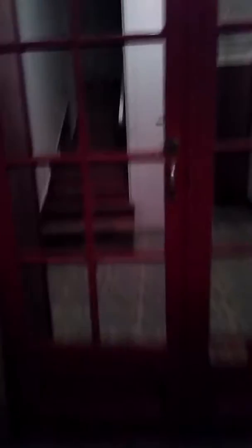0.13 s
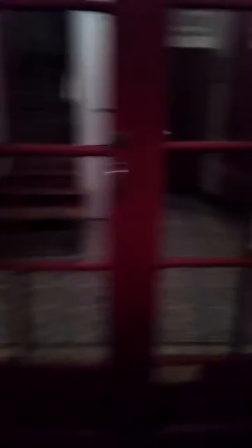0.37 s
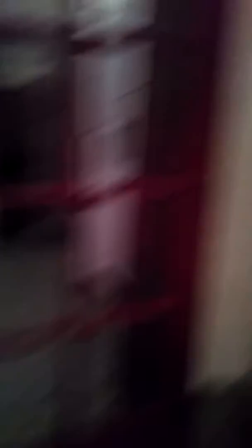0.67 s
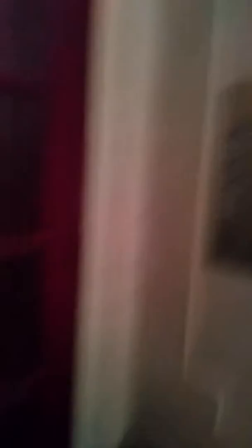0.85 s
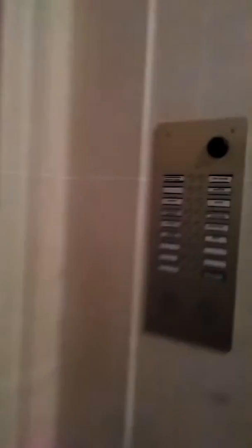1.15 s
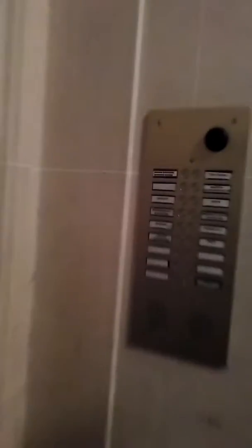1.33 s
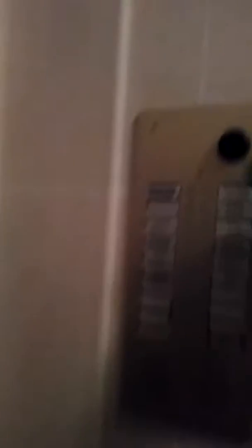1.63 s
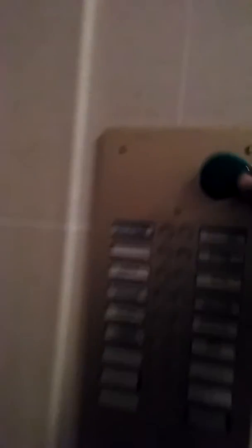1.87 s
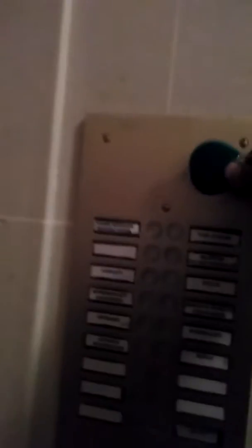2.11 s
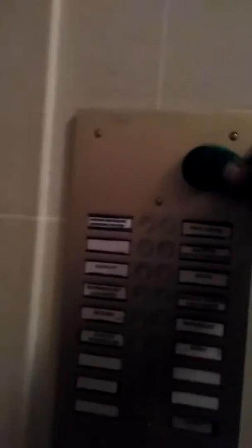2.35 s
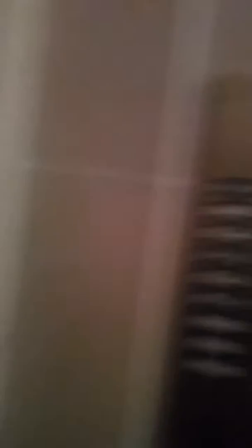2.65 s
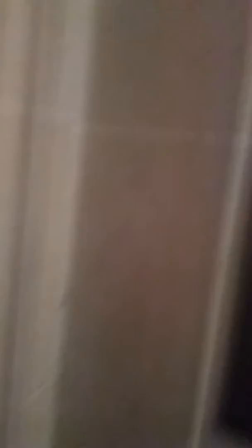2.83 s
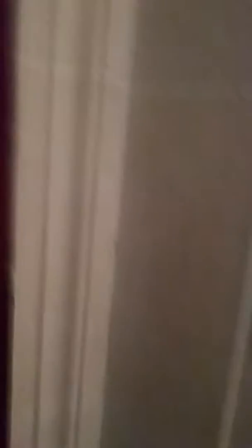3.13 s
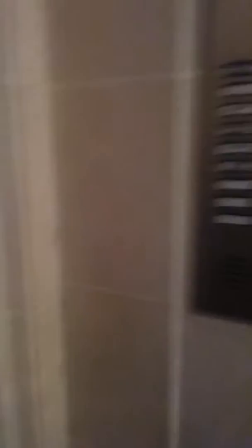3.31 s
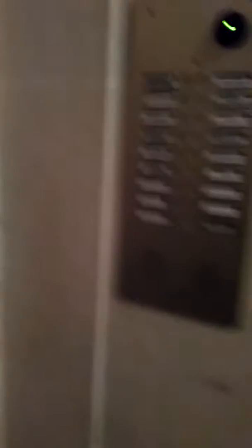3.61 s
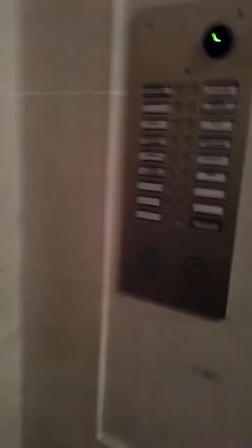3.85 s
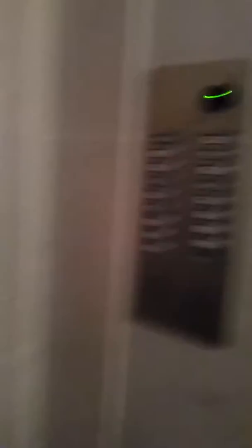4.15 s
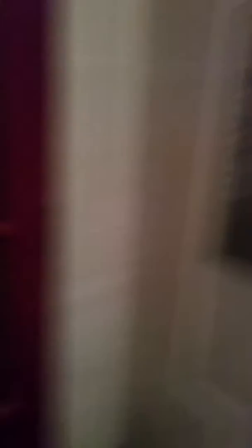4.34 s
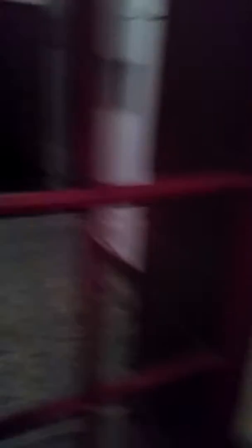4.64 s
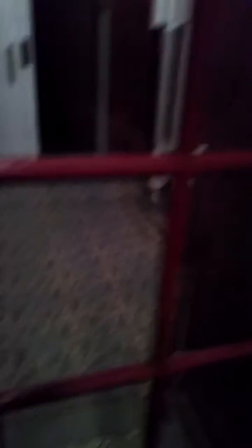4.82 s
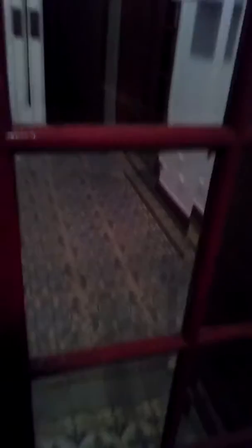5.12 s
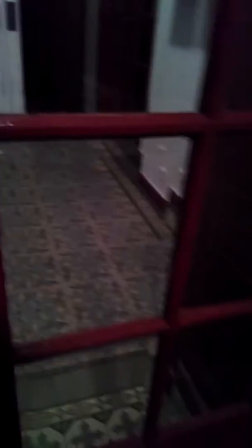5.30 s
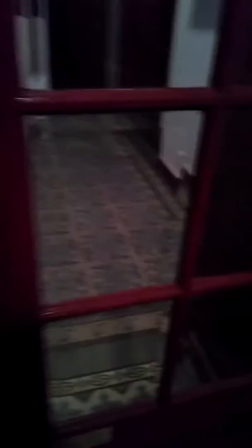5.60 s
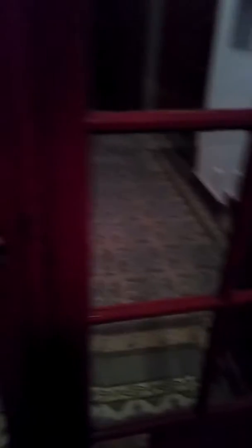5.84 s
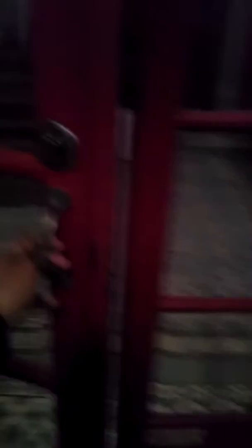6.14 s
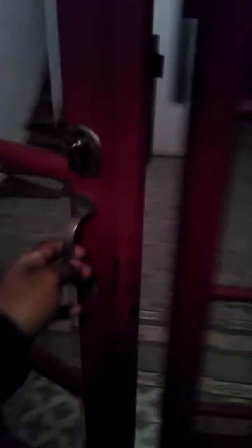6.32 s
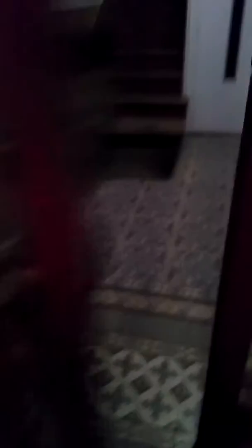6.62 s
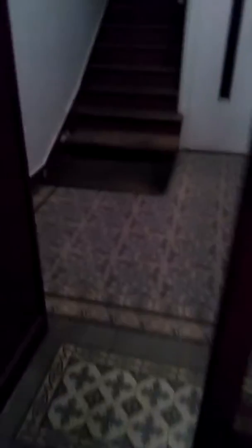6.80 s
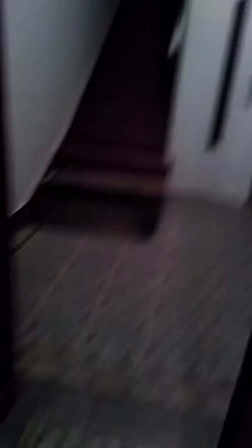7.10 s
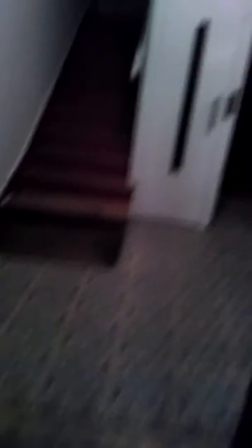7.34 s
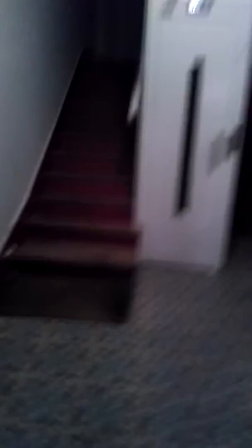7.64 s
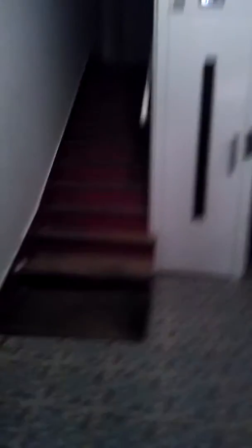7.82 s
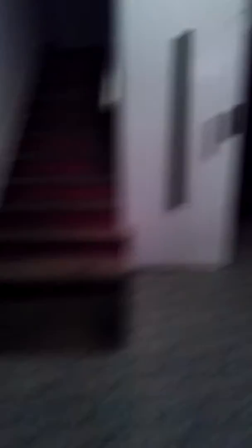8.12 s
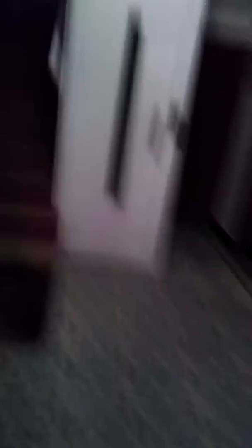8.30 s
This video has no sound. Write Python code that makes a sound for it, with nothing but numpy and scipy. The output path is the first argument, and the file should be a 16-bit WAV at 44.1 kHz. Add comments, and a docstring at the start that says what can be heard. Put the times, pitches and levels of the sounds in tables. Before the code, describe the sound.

Bright key clinks over passing tyre noise and a low engine hum, then a double metallic clack from a door lock. Dry rubbing, ticks and tiny squeaks follow very close on the left as the street noise fades. A huge clipped metal bang with quick rattles echoes in a hard entrance hall; later the hinge whistles faintly, the latch snaps back, and quiet footfalls scuff tiles amid light air buffeting.

```python
"""Iron gate of a lift hall

Keys jingle while a car passes in the street; an electric lock clacks and the gate's latch rattles and bangs into
clipping. Blows are noise cracks with ringing modes and a tiled hall's tail, and the latch later snaps back.
Fingers rub and tap beside the left microphone port: band-split, flickering noise and short resonant ticks.
The car is noise and wavering low tones; clothes and soles are shaped noise, and buffets of air are slow, uneven cycles.
"""
import sys
import numpy as np
from scipy import signal
from scipy.fft import rfft, irfft, next_fast_len
from scipy.io import wavfile
from scipy.ndimage import uniform_filter1d

SR = 44100
rng = np.random.default_rng(int(sys.argv[2]) if len(sys.argv) > 2 else 0)


def wav_record(signal):
    """Record a signal, one row per channel, as 16-bit PCM in the file named by sys.argv[1]."""
    frames = np.transpose(np.atleast_2d(signal))
    bounded = np.clip(frames, -1, 1)
    # unit amplitude maps onto the largest positive 16-bit level
    quanta = np.round(bounded * 32767).astype(np.int16)
    wavfile.write(sys.argv[1], SR, quanta)


N = 373086
TIME = np.arange(N) / SR
TOP_HZ = 14600  # nothing sounds above this

# Blows of the gate, the latch springing back, the lock's armature and bolt,
# keys knocking (and two fingertip taps at 2.61 and 2.636 s), soft footfalls:
# [t/s, level/dB, crack decay/s, hall and ringing share/dB]
GATE_BLOWS = [(5.360, -30.5, 0.029, -3.5), (5.384, -33, 0.017, -1), (5.4175, -18.5, 0.0066, -14.5),
              (5.429, -18.5, 0.016, -4), (5.558, -13.5, 0.0084, -7.5), (5.5645, 0.5, 0.021, -1.5),
              (5.585, -12.5, 0.011, -8.5), (5.609, -13, 0.01, -10.5), (5.642, -8.5, 0.0059, -6),
              (5.697, -17, 0.005, -7.5)]
LATCH_BLOWS = [(7.056, -18, 0.0071, -4.5), (7.065, -25, 0.0038, -15)]
LOCK_BLOWS = [(2.070, -15.5, 0.0057, -19.5), (2.0755, -8, 0.0036, -10)]
KEY_AND_TAP_BLOWS = [(.040, -28.5, 0.0045, -15), (.056, -26.5, 0.003, -10), (.1075, -11, 0.0038, -10.5),
                     (.157, -21.5, 0.011, -6), (.4334, -20, 0.0028, -15), (.6065, -39, 0.0037, -15),
                     (.6255, -28.5, 0.0079, -12), (.707, -35, 0.0044, -15), (2.449, -41, 0.01, -1),
                     (2.544, -28.5, 0.0085, -10.5), (2.5655, -26, 0.0066, -10),
                     (2.61, -27.5, 0.0084, -21.5), (2.636, -11, 0.0043, -16.5)]
FOOTFALLS = [(7.655, -39.5, 0.027, -1), (7.68, -48, .02, 4), (7.79, -36.5, 0.016, -6.5),
             (8.15, -53, 0.021, -5), (8.35, -65, 0.034, -13)]
# Colours of those blows: [f/Hz, level/dB]
GATE_COLOUR = [(25, -29.5), (60, -3.5), (125, -16), (200, -7.5), (270, -17), (330, -6.5), (520, -11),
               (1000, -8), (1700, -2.5), (2700, -1), (4000, -9.5), (6300, -13.5), (10300, -6.5),
               (14000, -23)]
LATCH_COLOUR = [(150, -12), (350, -18), (480, -15), (700, -16.5), (1100, -4), (1500, -11), (2100, 0),
                (3400, -12.5), (6300, -10.5), (10500, -1), (14000, -13.5)]
LOCK_COLOUR = [(150, -41), (290, -18), (370, -5), (520, 3), (850, -19.5), (1250, -2), (1600, -11.5),
               (2700, -4), (3300, -15), (4600, -21), (5500, -13), (7000, -22.5), (10200, -17.5),
               (14000, -34.5)]
KEY_COLOUR = [(1500, -47), (3200, -19), (4300, -14), (5500, -12), (7000, -8.5), (9500, 1.5), (12000, -6),
              (14000, -14)]
SHOE_COLOUR = [(40, 4), (90, 9), (200, -4), (380, -4), (700, -33), (1500, -28), (5000, -32)]
# Ringing modes of the struck metal: [f/Hz, relative level/dB, t60/s]
GATE_MODES = [(318, -7, 1.0), (784, -4, 1.0), (908, -6, 1.0), (1036, -6, 1.0), (1277, -4, .8),
              (1308, -1, .8), (1388, -2, .85), (1577, -5, .9), (1688, 0, .7), (1833, -2, .7),
              (1979, 1, .85), (2058, -3, .6), (2234, 0, .7), (2394, -3, .7), (2548, -2, .7), (2659, 0, .6),
              (2990, -1, .8), (3103, -3, .65), (3347, -4, .6), (3822, -9, .5), (4086, -7, .5),
              (8749, -7, .35)]
LATCH_MODES = [(473, 2, 1), (874, 0, .6), (1110, 4, 0.37), (1965, 7, 0.67), (2180, 5, 0.52)]
LOCK_MODES = [(365, -8, 0.48), (505, 3, 0.79), (530, -1, 0.89), (1280, 0.5, 1), (2720, 9, 0.99),
              (2560, -5.5, 0.81), (5800, -17.5, .35), (10300, -6.5, 0.34)]
KEY_MODES = [(4190, -5, 0.31), (5780, -5, 0.068), (8900, 14, 0.11), (10270, -5, .08), (11780, -1, .08)]
# Reverberation of the tiled hall, before each source scales it: [f/Hz, t60/s]
HALL = [(60, 1.3), (260, 1.15), (700, 1.09), (1840, 0.94), (3000, 0.86), (4850, 0.75), (10000, 0.5),
        (14000, 0.5)]
# Whistle of the hinge as the gate swings: [t/s, f/Hz, level/dB]
HINGE = [(6.1, 2915, -100), (6.3, 2890, -65.5), (6.5, 2830, -60), (6.62, 2840, -54.5), (6.7, 2835, -63.5),
         (6.8, 2830, -100)]

# Strokes of skin over the port: [start t/s, length/s, relative level/dB, swell over the stroke/dB, dullness/dB]
STROKES = [(2.61, 0.031, -28.5, 5, -15), (2.678, 0.065, -22, 5.5, 0), (2.995, 0.047, -21, 3, 5.5),
           (3.152, 0.13, -26.5, 8, 3.5), (3.468, 0.0068, -29.5, -1, -7.5), (3.515, .012, -33, 0, 2),
           (3.585, 0.029, -35, 2, -7), (3.728, 0.058, -30.5, 8.5, 1.5), (3.792, 0.15, -23.5, -7.5, -2),
           (3.957, 0.12, -27, -16.5, -4), (4.171, 0.11, -33, 2, -2.5), (4.355, 0.13, -22.5, -10, -9),
           (4.507, 0.012, -34.5, 0, -2)]
STROKE_ATTACK_S, STROKE_RELEASE_S = 0.0044, 0.012
# Between strokes the finger rests on the case and creeps: (from s, to s), relative level dB
HOLD_S, CREEP_DB = (2.56, 4.57), -46
# The skin catches now and then: catches per s, limit of a surge relative to the slide dB, decay s
CATCHES_PER_S, CATCHING_DB, CATCHING_S = 60, 2.5, 0.0007
# Colour of skin on the port: [f/Hz, level/dB]
SKIN_COLOUR = [(300, -41.5), (2000, -36.5), (2900, -20), (4200, -7), (5900, -11), (8000, -3.5),
               (10000, 1.5), (12000, -2.5), (14200, -13.5)]
# Fingertips knocking by the port: [t/s, level/dB, tick centre f/Hz, low knock relative level/dB]
TAPS = [(2.632, -11.5, 9800, -37), (2.67, -14.5, 8500, -28), (2.682, -12.5, 5640, -34),
        (2.757, -8, 8800, -18), (2.781, -12, 9150, -20), (2.801, -22, 9530, -30), (2.874, -23, 10300, -30),
        (2.957, -27.5, 9100, -27), (2.99, -28, 4260, -8), (3.0166, -4, 9600, -28), (3.078, -20, 8460, -13),
        (3.2573, 2, 6000, -14), (3.2594, 4, 11300, -24), (3.285, -16, 5000, -15.5),
        (3.504, -17.5, 5240, -22), (4.09, -27, 4320, -25), (4.132, -26, 4200, -17),
        (4.3467, -30.5, 9000, -16), (4.3593, -18, 10100, -23), (4.5132, -22.5, 6900, -20),
        (4.564, -42, 10100, -4)]
TAP_DECAY_S = .0021
# The fingertip squeaking on the case: [t/s, level/dB, f/Hz, length/s]
SQUEAKS = [(2.708, -19.5, 7900, .012), (2.735, -17, 7660, .014), (3.21, -27, 10000, 0.042),
           (4.378, -28, 10620, .014)]
# The grip shifting on the phone: [t/s, level/dB, f/Hz]
GRIPS = [(2.99, -33, 168), (3.865, -42.5, 110), (3.926, -45.5, 80), (4.03, -46, 130), (4.14, -38.5, 118),
         (4.195, -43, 122), (4.355, -38.5, 68), (4.46, -42, 137), (4.516, -40.5, 109.4),
         (4.569, -47.5, 170)]
GRIP_S = 0.013

# Soles scuffing the tiles: [t/s, level/dB, f/Hz, length/s]
SCUFFS = [(7.56, -54.5, 2430, 0.068), (8.16, -59, 776, 0.026), (8.37, -56, 893, 0.03),
          (8.44, -58, 738, 0.044)]
# Colour of the fabric: [f/Hz, level/dB]
CLOTH_COLOUR = [(1500, -29), (4500, -15), (6000, -12), (8000, -4), (10200, 1.5), (12000, -5), (14200, -14)]
# Swishes of clothes, one for each swing of arm or leg: [t/s, relative level/dB]
SWISHES = [(1.42, -36.5), (2.04, -32), (5.19, -54), (6.18, -46), (6.885, -46.5), (7.52, -45.5),
           (8.23, -45.5)]
SWISH_RISE_S, SWISH_FALL_S = 0.04, .07
# Steady rustle of the moving body: [t/s, relative level/dB]
RUSTLE = [(0, -45.5), (1.3, -51), (2.4, -57), (4.75, -67.5), (5, -61), (6.55, -56), (6.77, -63.5),
          (7.1, -51), (7.95, -57), (8.46, -49.5)]
# Air buffeting mostly one port: [t/s, peak level/dB, f/Hz, left minus right/dB]
PUFFS = [(5.44, -38.5, 50.05, 16), (7.121, -38, 77.4, -25), (7.189, -42, 93, -4), (7.308, -33, 123, 15),
         (7.339, -35, 78, 22), (7.402, -39, 62, -15), (7.565, -34, 71.4, 23), (7.705, -42.5, 82, 17),
         (7.83, -44.5, 65, 6)]
PUFF_CYCLES = 1  # cycles for the swell to change by a factor e, either side of its peak

# Colours of the tyres and of the car's rumble: [f/Hz, level/dB]
TYRE_COLOUR = [(60, -20.5), (150, -16.5), (230, -19), (300, -15.5), (450, -14), (850, -17), (1500, -19),
               (2100, -23), (2700, -27), (3600, -42.5), (5500, -41.5), (14000, -54.5)]
RUMBLE_COLOUR = [(22, -21), (45, -2.5), (62, -4.5), (80, -7.5), (120, -11.5), (160, -23), (250, -32.5),
                 (1000, -67)]
# Engine lines: [f/Hz, relative level/dB]
ENGINE_LINES = [(81, 0), (100, -14), (62, -11), (44, -13)]
# Level of the engine's low hum: [t/s, relative level/dB]
HUM_LEVEL = [(0.0, -63), (0.58, -76), (1.35, -46.5), (1.96, -54.5), (2.0, -46), (2.55, -41), (2.8, -59.5),
             (3.13, -50.5), (3.6, -68), (4.49, -58.5), (5.0, -78), (5.2, -65.5)]
HUM_FADE_DB_PER_S = 11  # after the last point of the hum's level
# The exhaust booming as the car pulls by: [t/s, level/dB, f/Hz, length/s]
EXHAUST_BOOMS = [(.12, -58, 114, 0.19), (.4, -50.5, 152, 0.23)]
# The car passes at a steady speed, then the house fronts screen it
CAR_PASSES_S, CAR_SPEED_M_S, CAR_DISTANCE_M = 0.8, 7.27, 10.6
SCREEN_S, SCREEN_SPREAD_S, SCREEN_DB = 4.08, .42, -16
# The tail pipe points backwards, so the rumble peaks after the tyres and swells from nothing
RUMBLE_LAG_S, RUMBLE_SWELL_S = 1.1, .3
# Resonances of the stone porch: [f/Hz, width/Hz, peak level/dB]
PORCH = [(288, 81, 6.5), (444, 17, 1), (745, 170, 3), (845, 70, 2), (1350, 190, 4)]
# The town at rest: [f/Hz, level/dB]
TOWN_COLOUR = [(22, -16), (50, 0), (85, -7), (150, -13), (300, -16), (900, -25), (1800, -28), (2900, -28),
               (4500, -43.5), (14000, -42.5)]

# Likeness of the left and right ports, from -1 opposed to 0 unrelated: [f/Hz, likeness]
LIKENESS = [(60, -0.97), (130, -0.93), (290, -0.9), (640, -0.5748), (1400, -0.06), (3000, 0)]
# Colour of the right port against the left: [f/Hz, level/dB]
RIGHT_PORT = [(100, -0.12), (400, -4), (750, -0.5), (1300, -5), (2500, -6), (3600, -2), (6000, -1.5),
              (8000, -7), (10500, -15.5), (14000, -11)]


def gate():
    """Iron gate: latch rattles and bangs excite many long modes and the hall."""
    return strike(GATE_BLOWS, GATE_COLOUR, GATE_MODES, ring_db=-8.5, bright_db=5.5, hall_scale=0.96, build_s=0.0049)


def latch():
    """Latch springing back: two short cracks with a few modes and a slowly building tail."""
    return strike(LATCH_BLOWS, LATCH_COLOUR, LATCH_MODES, ring_db=-16.5, bright_db=2.0, hall_scale=0.76, build_s=0.024)


def lock():
    """Electric lock: armature and bolt clack in quick succession."""
    return strike(LOCK_BLOWS, LOCK_COLOUR, LOCK_MODES, ring_db=-12.5, bright_db=7.0, hall_scale=0.92, build_s=0.0046)


def keys_and_two_taps():
    """Keys knocking, and two fingertip taps in the same voice: bright cracks with short, high modes."""
    return strike(KEY_AND_TAP_BLOWS, KEY_COLOUR, KEY_MODES, ring_db=0.5, bright_db=4.0, hall_scale=1.17, build_s=0.012)


def strike(blows, spectrum, modes, ring_db, bright_db, hall_scale, build_s):
    """Each blow is a short crack, followed by the object's modes and the swelling hall."""
    out = np.zeros((2, N))
    t = np.arange(2 ** 16) / SR
    tail = hall_tail(spectrum, t, hall_scale) * (1 - np.exp(-t / build_s))
    after = tail + undb(ring_db) * ringing(modes, t)
    for s, db, decay, hall_db in blows:
        crack = colour(field(spectrum, size=8192), [(3000, 0.0034), (9000, bright_db)])
        crack = mottle(crack, spacing_hz=220, patchy_db=3)
        add(out, s, undb(db) * crack * np.exp(-t[:crack.shape[1]] / decay))
        add(out, s, undb(db + hall_db) * after)
    return out


def ringing(modes, t, width_hz=9):
    """Free modes, scattered by the hall so that each wavers on its way to each port."""
    out = np.zeros((2, len(t)))
    coarse = np.arange(0, t[-1] + 1, .5 / width_hz)
    for hz, db, t60 in modes:
        alike = np.clip(across(LIKENESS, hz), -1, 1)
        mid, side = (np.interp(t, coarse, [1, 1j] @ rng.standard_normal((2, len(coarse))))
                     * np.sqrt(1 + sign * alike) for sign in (1, -1))
        wavering = np.array([mid + side, mid - side])
        out += undb(db) * fade(t, t60) * np.real(wavering * np.exp(2j * np.pi * hz * t))
    return out / np.sqrt(sum(undb(db) ** 2 for _, db, _ in modes) + 1e-12)


def hall_tail(spectrum, t, scale):
    """Dense reflections: each band dies at the hall's own rate, its t60 times scale."""
    noise = rfft(mottle(field(spectrum, size=len(t)), spacing_hz=55, patchy_db=2.6))
    hz = np.fft.rfftfreq(len(t), 1 / SR)
    centres = [row[0] for row in HALL]
    out = 0
    # overlapping bands, each full at its own centre and zero at its neighbours
    for share, (_, t60) in zip(np.eye(len(HALL)), HALL):
        band = irfft(noise * across(list(zip(centres, share)), hz))
        out = out + band * fade(t, t60 * scale)
    return out


def hinge(width_hz):
    """Faint, rough whistle of the dry hinge: a gliding tone with a wandering amplitude and phase."""
    hz, db = along(HINGE)
    turn = np.exp(2j * np.pi * np.cumsum(hz) / SR)
    return np.array([np.real(drift(N, width_hz) * turn) for _ in range(2)]) * undb(db)


def fingers(right_db, echo_db, right_tap_db):
    """Rubbing, knocks and squeaks beside the left port; a little returns from the porch."""
    out = rubbing(grain_db=1.5, flicker_db=2.5) * undb([[0], [right_db]])
    for s, db, hz, knock_db in TAPS:
        add(out, s, undb(db) * tap(hz, knock_db) * undb([[0], [right_tap_db]]))
    t = np.arange(2 ** 15) / SR
    walls = rng.standard_normal((2, len(t))) * fade(t, 0.54)
    walls = walls / np.linalg.norm(walls[0])
    echo = signal.fftconvolve(out[:1], walls, axes=1)[:, :N]
    squeaks = bumps(SQUEAKS, skirt_db=-38.5) * undb([[0], [right_tap_db]])
    return out + squeaks + undb(echo_db) * echo


def tap(hz, knock_db):
    """Fingertip on the case: a high tick, with its spot's own resonances, over a low knock."""
    t = np.arange(2048) / SR
    tick = colour(field(SKIN_COLOUR, size=len(t)), [(hz / 2, 0), (hz, 7), (hz * 2, 0)])
    tick = mottle(tick, spacing_hz=450, patchy_db=5)
    knock = field([(100, -1.5), (400, -1.5), (1300, -0.5), (3000, -10), (8000, -29)], size=len(t))
    return tick / tick.std() * np.exp(-t / TAP_DECAY_S) + undb(knock_db) * knock * np.exp(-t / 0.0024)


def rubbing(grain_db, flicker_db):
    """Skin slips in fine grains; the gap under the finger keeps changing, so each band flickers alone."""
    slip_db, dull_db = pressure()
    n = 2 * next_fast_len(N // 2 + 1, real=True)
    skin = rfft(field(SKIN_COLOUR, size=n)[0])
    hz = np.fft.rfftfreq(n, 1 / SR)
    out, step_hz = 0, 1150
    for centre in np.arange(0, TOP_HZ, step_hz):
        band = irfft(skin * np.maximum(1 - np.abs(hz - centre) / step_hz, 0))[:N]
        # firmer pressure favours the lower resonances of the port
        tilt_db = -dull_db / 2 * np.tanh((centre - 8500) / 1200)
        out = out + band * undb(flicker_db * walk(70) + tilt_db)
    return out * catching() * undb(slip_db - 3 + grain_db * walk(600))


def pressure():
    """Level and dullness of the rubbing: each stroke bites, swells or eases, and lets go."""
    power = undb(2 * CREEP_DB) * ((TIME > HOLD_S[0]) & (TIME < HOLD_S[1])) + 1e-12
    dull = np.zeros(N)
    for s, length, db, swell_db, dull_db in STROKES:
        t = TIME - s
        grip = np.clip(t / STROKE_ATTACK_S, 0, 1) * np.exp(-np.maximum(t - length, 0) / STROKE_RELEASE_S)
        stroke = (grip * undb(db + swell_db * np.clip(t / length, 0, 1))) ** 2
        power = power + stroke
        dull = dull + dull_db * stroke
    return 10 * np.log10(power), dull / power


def catching():
    """Brief random surges of the rubbing where the skin sticks and lets go."""
    when, size = rng.random(N), rng.exponential(size=N)
    impulses = size * (when < CATCHES_PER_S / SR)
    surges = signal.lfilter([1], [1, -np.exp(-1 / (CATCHING_S * SR))], impulses)
    return 1 + undb(CATCHING_DB) * np.tanh(surges)


def grip_shifts():
    """The hand shifting on the phone: soft, low thuds of noise."""
    return bumps([(*grip, GRIP_S) for grip in GRIPS], skirt_db=-8.5)


def feet():
    """Soft footfalls without ringing modes, and soles scuffing the tiles."""
    steps = strike(FOOTFALLS, SHOE_COLOUR, [], ring_db=0, bright_db=0, hall_scale=0.57, build_s=0.013)
    return steps + bumps(SCUFFS, skirt_db=-7.5)


def bumps(table, skirt_db):
    """Soft contacts or booms: each a brief swell of noise round its own pitch."""
    out = np.zeros((2, N))
    for s, db, hz, length in table:
        t = TIME[np.abs(TIME - s) < 3 * length + .1] - s
        spectrum = [(hz / 8, 3 * skirt_db), (hz / 2, skirt_db), (hz, 0), (hz * 2, skirt_db), (hz * 32, 6 * skirt_db)]
        body = colour(rng.standard_normal((2, len(t))), spectrum)
        add(out, s + t[0], undb(db) * body / body.std() * np.exp(-(t / length) ** 2))
    return out


def clothes(gain_db):
    """Fabric rustles as the body moves and swishes at each swing."""
    power = undb(along(RUSTLE)[0]) ** 2
    for s, db in SWISHES:
        t = TIME - s
        swing = np.exp(-np.where(t < 0, (t / SWISH_RISE_S) ** 2, t / SWISH_FALL_S))
        power = power + (undb(db) * swing) ** 2
    return field(CLOTH_COLOUR, size=N) * np.sqrt(power) * undb(gain_db + .7 * walk(53))


def buffets():
    """Eddies press mostly on one port at a time, a few slow, uneven cycles each."""
    out, wobble = np.zeros((2, N)), 1.36 * walk(90)
    for s, db, hz, pan_db in PUFFS:
        t = TIME - s
        eddy = np.exp(-np.abs(t) * hz / PUFF_CYCLES) * np.cos(2 * np.pi * hz * t + wobble)
        out += eddy * undb(db + np.array([[pan_db], [-pan_db]]) / 2)
    return out


def car(road_db, engine_db, rumble_db):
    """Tyres roar and fade down the street; the engine's low lines waver in pitch and level."""
    road = mottle(porch(field(TYRE_COLOUR, size=N)), spacing_hz=90.3, patchy_db=1.5)
    road = road * passing(TIME) * undb(road_db + 0.89 * walk(11))
    swell = 1 - np.exp(-TIME / RUMBLE_SWELL_S)
    rumble = field(RUMBLE_COLOUR, size=N) * passing(TIME - RUMBLE_LAG_S) * swell * undb(rumble_db)
    hum_db = along(HUM_LEVEL)[0] - HUM_FADE_DB_PER_S * np.maximum(TIME - HUM_LEVEL[-1][0], 0)
    hum = 0
    for hz, db in ENGINE_LINES:
        level = undb(db + 1.5 * walk(6))
        phase = 2 * np.pi * np.cumsum(hz * (1 + 0.0099 * walk(2.1))) / SR
        hum = hum + level * np.sin(phase)
    engine = hum * undb(hum_db + engine_db) * np.array([[1], [-.8]])  # the ports hear it opposed
    return road + rumble + bumps(EXHAUST_BOOMS, skirt_db=-53) + engine


def passing(t):
    """Gain of the car: one over its distance, less again once the house fronts screen it."""
    near = CAR_DISTANCE_M / np.hypot(CAR_DISTANCE_M, CAR_SPEED_M_S * (t - CAR_PASSES_S))
    return near * undb(SCREEN_DB / (1 + np.exp((SCREEN_S - t) / SCREEN_SPREAD_S)))


def town():
    """The town at rest: diffuse, mostly low noise with a slowly wandering level."""
    return porch(field(TOWN_COLOUR, size=N)) * undb(-55 + 0.66 * walk(5.2))


def porch(x):
    """The stone recess of the doorway lifts a few narrow bands."""
    out = x
    for hz, width, db in PORCH:
        band = signal.lfilter(*signal.iirpeak(hz, hz / width, fs=SR), x)
        out = out + (undb(db) - 1) * band
    return out


def field(spectrum, size):
    """Diffuse noise at the two ports, rms 1: opposed in the bass, unrelated in the treble."""
    n = next_fast_len(size, real=True)
    hz = np.fft.rfftfreq(n, 1 / SR)
    alike = np.clip(across(LIKENESS, hz), -1, 1)
    gain = undb(across(spectrum, hz)) * (hz < TOP_HZ)
    mid, side = rfft(rng.standard_normal((2, n))) * np.sqrt([1 + alike, 1 - alike]) * gain
    x = irfft([mid + side, mid - side], n)[:, :size]
    return x / x.std()


def mottle(x, spacing_hz, patchy_db):
    """Many weak resonances: a bumpy response, the same at both ports."""
    hz = np.fft.rfftfreq(x.shape[-1], 1 / SR)
    bumps_db = patchy_db * np.clip(rng.standard_normal(1024), -2, 2)
    gain = undb(np.interp(hz / spacing_hz, np.arange(len(bumps_db)), bumps_db))
    return irfft(rfft(x) * gain / np.sqrt(np.mean(gain ** 2)), x.shape[-1])


def colour(x, spectrum):
    """Filter by (f/Hz, level/dB) points."""
    n = next_fast_len(x.shape[-1], real=True)
    gain = undb(across(spectrum, np.fft.rfftfreq(n, 1 / SR)))
    return irfft(rfft(x, n) * gain, n)[..., :x.shape[-1]]


def drift(size, hz):
    """A complex amplitude that wanders at about hz; power 1."""
    poles = np.poly([np.exp(-2 * np.pi * abs(hz) / SR)] * 2)
    noise = [1, 1j] @ rng.standard_normal((2, size + 4096))
    z = signal.lfilter([1], poles, noise)[4096:]  # drop the filter's start-up
    return z / np.sqrt(np.mean(np.abs(z) ** 2))


def walk(rate):
    """Slow, smooth chance, about rate new values a second, with a spread near 1."""
    k = max(int(SR / rate), 2)
    held = np.repeat(rng.standard_normal(N // k + 1), k)
    return 1.3 * uniform_filter1d(uniform_filter1d(held, k), k)[:N]


def fade(t, t60):
    """Free decay by 60 dB in t60 seconds."""
    return np.exp(-np.log(1000) * t / t60)


def undb(db):
    """Decibels to gain."""
    return 10 ** (np.asarray(db) / 20)


def across(table, hz):
    """Read (f/Hz, value) points on a log-frequency axis."""
    points, values = np.transpose(table)
    return np.interp(np.log(hz + 1), np.log(points), values)


def along(table):
    """Read every column of a time curve at each sample."""
    s, *columns = np.transpose(table)
    return [np.interp(TIME, s, c) for c in columns]


def add(out, s, x):
    """Mix x into out from time s."""
    i = int(s * SR)
    out[:, i:i + x.shape[-1]] += x[..., :N - i]


def scene():
    """Gate, lock, keys, hands, body and street summed."""
    blows = gate() + latch() + hinge(width_hz=80) + lock() + keys_and_two_taps()
    hands = fingers(right_db=-24.0, echo_db=-22.5, right_tap_db=-13.5) + grip_shifts()
    body = feet() + clothes(gain_db=0.0) + buffets()
    street = car(road_db=-37, engine_db=20.5, rumble_db=-38.5) + town()
    return blows + hands + body + street


def record(dry):
    """The right port is duller; peaks are clipped just below full scale; then the top is cut."""
    ports = np.array([dry[0], colour(dry[1], RIGHT_PORT)])
    clipped = np.clip(ports, -.95, .95)
    return signal.sosfilt(signal.ellip(8, .2, 50, TOP_HZ, fs=SR, output="sos"), clipped)


dry = scene()
out = record(dry)
wav_record(out)
```